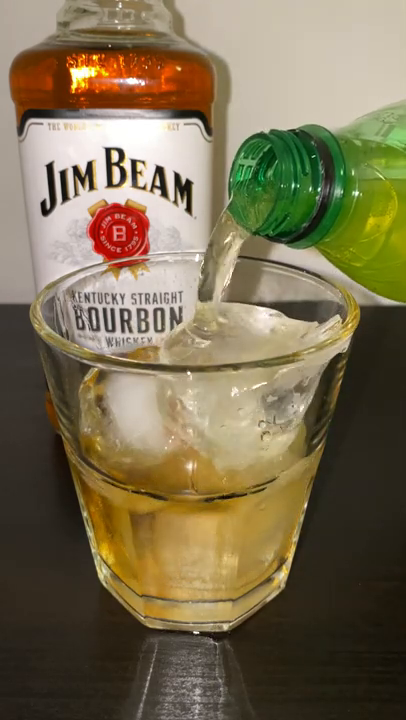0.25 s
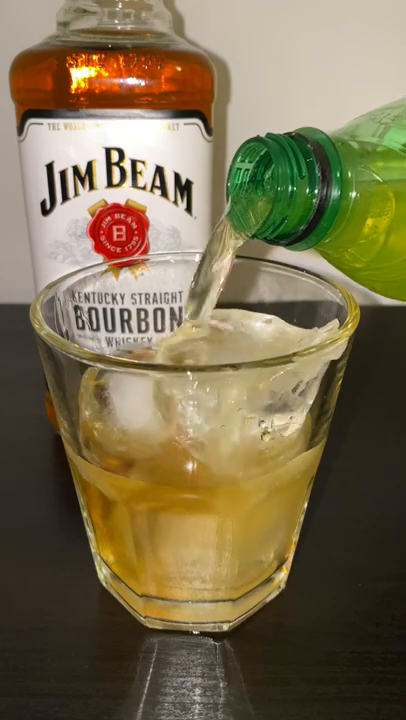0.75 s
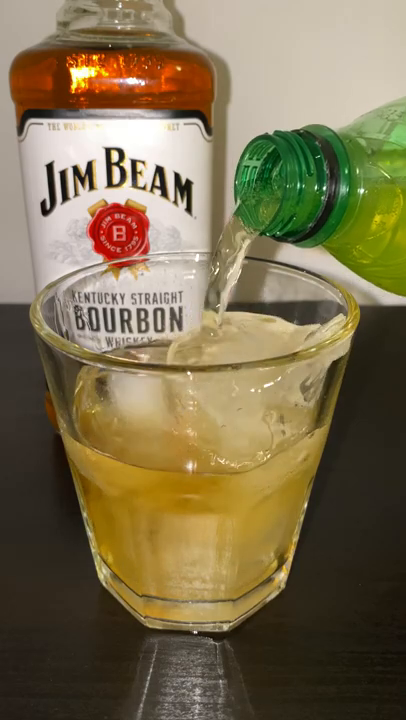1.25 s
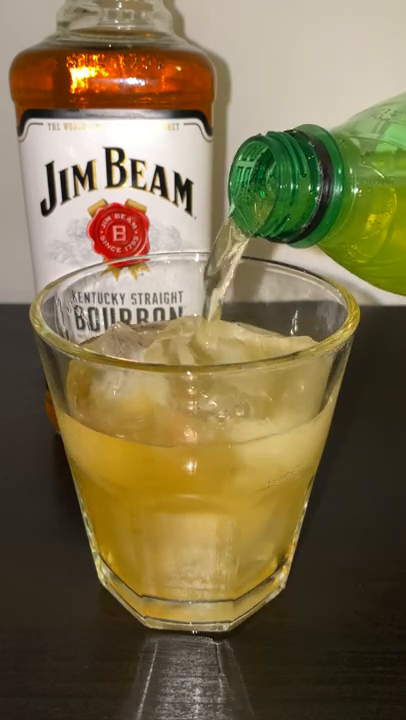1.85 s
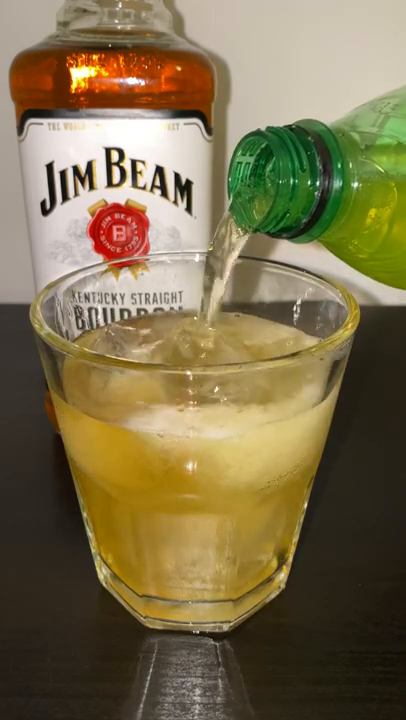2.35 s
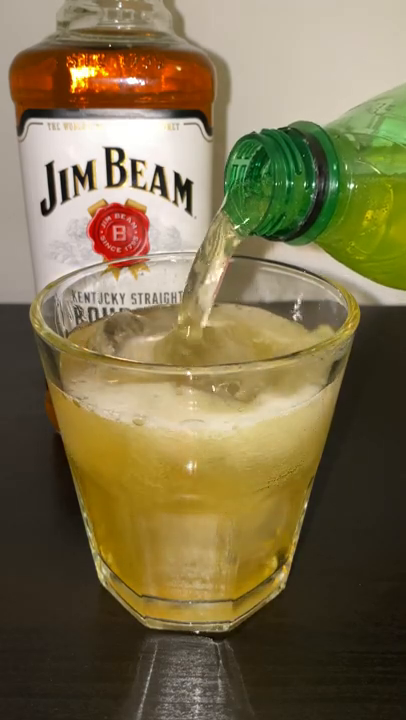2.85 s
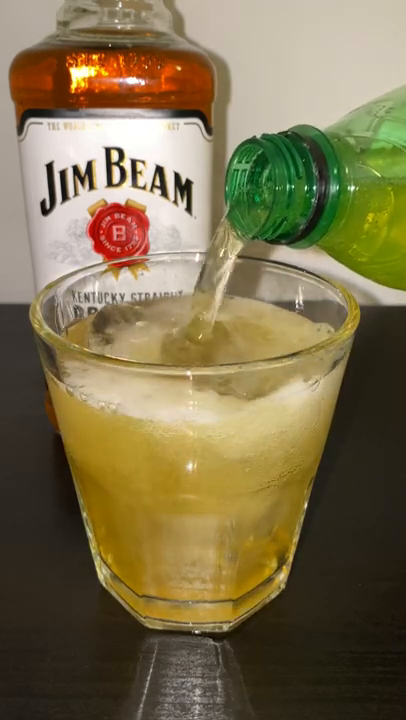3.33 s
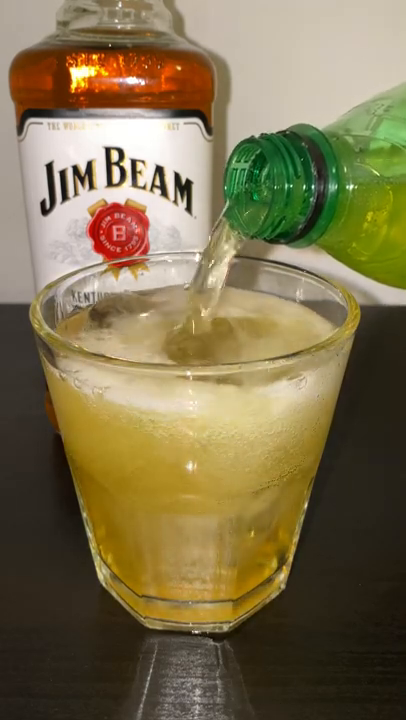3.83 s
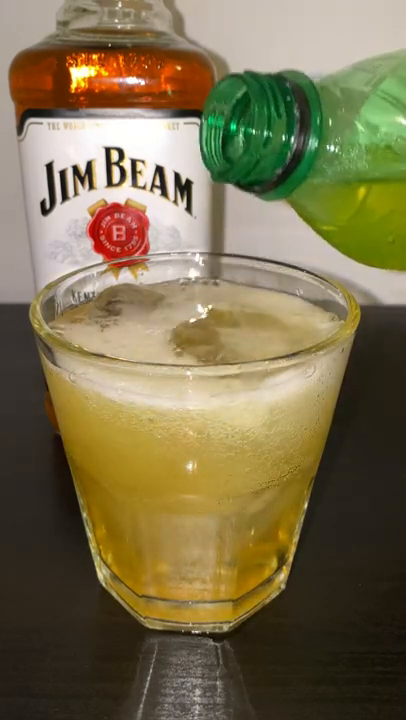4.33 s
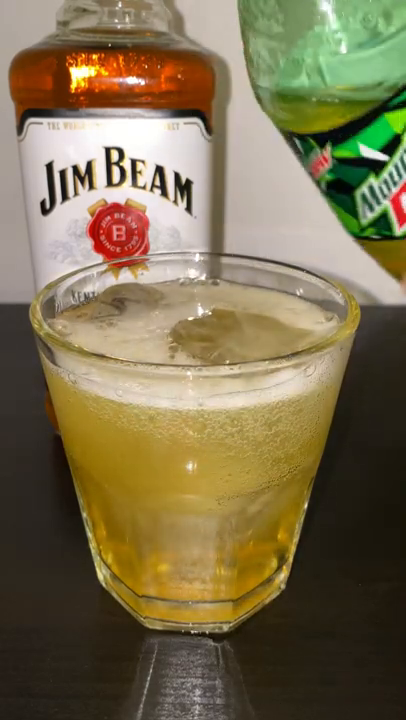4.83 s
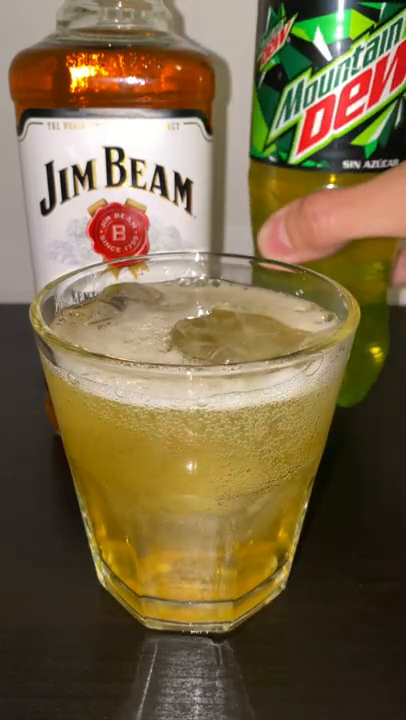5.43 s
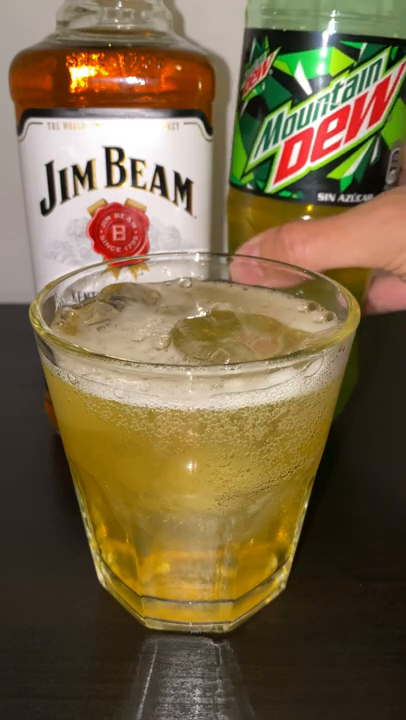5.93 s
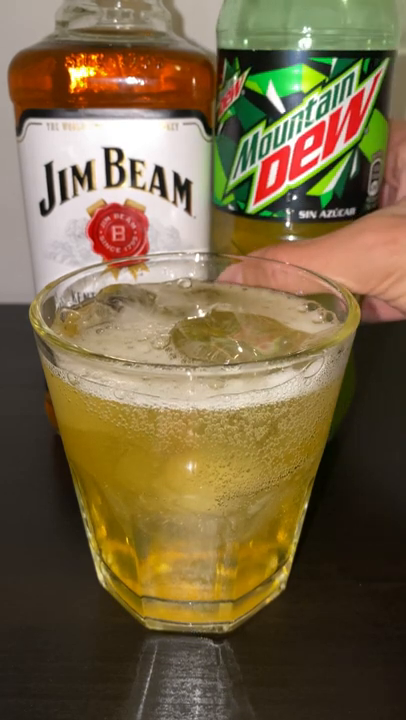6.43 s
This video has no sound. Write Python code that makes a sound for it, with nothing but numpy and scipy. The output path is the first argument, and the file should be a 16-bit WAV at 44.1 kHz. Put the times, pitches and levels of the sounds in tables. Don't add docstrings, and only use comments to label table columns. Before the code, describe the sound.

Close phone pickup, slight stereo, with low room rumble and faint hiss. Brittle ice ticks and trickling splashes lead into a cluster of glassy clinks and table knocks. The clatter stops and bubbly foam hiss rises, peaking around four seconds, over muted ice bumps. A plastic wall pops once; the fizz thins, then the bottle booms onto the table, slides and thumps again.

```python
import sys
import numpy as np
from scipy import signal
from scipy.fft import rfft, irfft
from scipy.io import wavfile
from scipy.ndimage import uniform_filter1d

SR = 44100
rng = np.random.default_rng(int(sys.argv[2]) if len(sys.argv) > 2 else 0)


def wav_out(sig):
    wavfile.write(sys.argv[1], SR, np.round(np.clip(np.atleast_2d(sig).T, -1, 1) * 32767).astype(np.int16))


def level_to_linear(level):
    exponent = np.asarray(level, float) / 20
    return 10 ** exponent


N = 294588

# f/Hz, level/dB per Hz
RUMBLE_SPECTRUM = [(12, -23), (20, -20.5), (53, 0), (75, -2), (89, 0.5), (108, -16), (129, -8.5),
                   (185, -13.5), (213, -15.5), (369, -31), (508, -25.5), (546, -24), (664, -33.5),
                   (700, -44.5), (1400, -48), (1820, -62), (3080, -120)]
# f/Hz, level/dB per Hz
MIC_HISS_SPECTRUM = [(650, -16), (1100, -42.5), (1610, 8), (2540, 3.5), (3050, 8.5), (3390, -22.5),
                     (7300, 6), (9020, -1.5), (11700, -16), (19800, -120)]
RUMBLE_DB, MIC_HISS_DB = -57.5, -88

# t/s, level/dB
FOAM_LEVEL = [(0, -88), (1.8, -87), (2.25, -82), (2.55, -77), (2.9, -72), (3.3, -69.5), (3.8, -67.5),
              (4.2, -66.5), (5.4, -67.5), (5.7, -70.5), (6.68, -75.5)]
# f/Hz, level/dB per Hz
FIZZ_SPECTRUM = [(590, -51.5), (1000, -38), (1290, -24), (1560, -12.5), (2230, -5), (2400, 0.5),
                 (2860, -0.5), (3400, -3), (3690, 1.5), (4200, -4.5), (4520, -3), (6970, -9.5), (9020, -19),
                 (11700, -45.5), (19800, -120)]
# f/Hz, width/Hz, level/dB
CAVITY_PEAKS = [(2650, 130, -4.5), (3060, 21, 8.5), (3704, 170, 3), (4474, 290, 4), (5060, 23, 9.5),
                (5630, 510, 3.5), (7100, 2300, 7.5)]

# t/s, peak level/dB, ring f/Hz, crackle over
# ring/dB
TICKS = [(0.1303, -71, 8860, 9), (0.178, -60, 6720, -18), (0.2034, -63, 6830, -17),
         (0.2359, -53, 5460, 7.5), (0.299, -60.5, 6940, 11.5), (0.3315, -61.5, 7100, 9.5),
         (0.3566, -62.5, 7100, 15.5), (0.478, -50, 6800, -1), (0.5544, -60, 6600, -13),
         (0.7467, -69, 9150, 3), (0.897, -60, 7500, -2), (0.9934, -59, 5100, 10),
         (1.112, -62.5, 6200, -3.5), (1.1413, -64, 5860, 5), (1.279, -71.5, 7800, 19),
         (1.2965, -57.5, 6680, -10), (1.4061, -65, 7150, 7), (4.4094, -59, 5000, -11),
         (2.1285, -71, 6360, 5), (2.2064, -76, 7400, 0), (2.5885, -70, 6550, 13), (3.7109, -84, 11130, 20),
         (4.41, -74, 10800, 2), (0.97, -55, 4800, -3),
         (0.218, -53.5, 3060, 9), (0.335, -65.5, 2380, 19), (0.537, -59, 1900, -5), (0.5768, -52, 1870, -2),
         (0.655, -41, 1990, -7), (0.702, -58.5, 3140, 6), (0.7472, -61, 2430, 5), (0.821, -51, 3790, 5),
         (0.85, -52, 3960, 3), (0.93, -59, 1710, -8), (1.039, -55.5, 2650, -10), (1.0587, -63.5, 3730, -10),
         (1.1013, -50.5, 1645, -11), (1.214, -50, 1620, -1.5), (1.2527, -46.5, 2710, -4),
         (1.1, -58, 2630, -12), (1.338, -49, 2860, 0), (1.3633, -46, 2730, 7), (1.3823, -58, 2220, -12.5),
         (1.4064, -47, 2620, 18), (1.42, -42.5, 2590, 18), (1.4724, -54, 1530, -14),
         (1.486, -38.5, 1940, 1), (1.487, -41.5, 2740, -8), (1.5194, -44, 2480, 7), (1.438, -48, 1900, -5),
         (1.4752, -46, 2500, -12), (1.518, -43, 1450, -3), (1.5647, -42, 2380, -16), (1.59, -55, 1693, 3.5),
         (0.5044, -54, 3850, 5), (0.6838, -57, 3120, 6), (0.759, -65, 1990, -10), (0.8848, -58, 3720, 12),
         (0.851, -65, 2400, -3), (1.06, -64, 2670, -12),
         (0.535, -58, 730, -10), (0.579, -48, 900, -9), (0.611, -54, 900, -10), (0.953, -48, 884, -10),
              (1.363, -40, 800, -6), (1.384, -43, 890, -11.5), (1.411, -55, 800, -14.5),
              (1.421, -38.5, 1010, -9), (1.438, -35, 904, -9), (1.474, -35, 884, -9),
              (1.487, -33, 986, -13.5), (1.519, -36, 1160, -11), (1.565, -47, 946, -14),
              (1.591, -34.5, 890, -4), (1.62, -45, 680, -3), (2.694, -61.5, 1400, 19),
              (2.694, -51.5, 757, -15), (2.693, -54.5, 1080, -10), (1.808, -52.5, 545, -9),
              (6.071, -60.5, 1520, -2), (6.078, -41.5, 338, -11),
         (.511, -57, 2000, 5), (0.524, -65, 2800, 4), (.59, -52.5, 3770, 11), (0.607, -52, 1730, 13),
         (.619, -55, 1900, 8), (.685, -69, 6860, 0), (.699, -56.5, 2020, 19), (.7475, -63, 3900, -2),
         (.821, -71, 1990, 5), (.83, -59, 4300, 6), (.832, -58, 3360, -9), (.896, -76, 8300, 5),
         (.897, -69, 4300, 2), (.907, -63, 4440, 8), (1.06, -71.5, 5670, 1), (1.074, -73, 7350, 0),
         (1.14, -63.5, 2670, -7), (1.2056, -68, 2860, 5), (1.2045, -70, 6800, 10), (1.254, -75, 7800, 9),
         (1.302, -60, 2870, 0), (1.321, -63.5, 1590, 0), (1.34, -62, 4300, 5), (1.347, -68, 4260, 2),
         (1.416, -46, 2700, 16), (1.452, -60, 2160, -3), (1.532, -53, 2630, 5.5), (1.594, -42.5, 2620, 7),
         (3.055, -74, 1770, 13), (.479, -55, 5600, -6), (0.494, -58, 7100, 1), (2.136, -74, 1800, -5),
         (0.657, -54.5, 2700, -5), (3.541, -61, 2480, -8), (1.518, -42.5, 1900, 8), (6.071, -54.5, 900, 8),
         (6.396, -64, 2830, 9)]
# f/Hz, t60/s
ROOM_T60 = [(100, 0.32), (700, 0.28), (2500, 0.2), (8000, 0.19)]

# start t/s, length/s, drops level/dB, fine spray over drops/dB
SPLASHES = [(0.16, 0.61, -83, 3.5), (0.458, 0.2, -69.5, -9.5), (0.523, 0.52, -66.5, -30),
            (.67, 0.11, -77, -27), (0.803, 0.07, -82, -15), (0.818, 0.38, -71.5, -20),
            (0.941, 0.054, -63, -5), (1.017, 0.36, -80, -8), (1.193, 0.094, -72.5, -2.5),
            (1.276, 0.56, -74, -10.5), (1.465, 0.12, -79, 2), (1.534, 0.26, -68, -18)]
# f/Hz, width/Hz, level/dB
WET_ICE_PEAKS = [(2400, 160, 11), (3200, 240, 7.5), (3900, 200, 7.5), (4340, 230, 9)]

# start t/s, length/s, weight level/dB, rattle over weight/dB
SETTLES = [(.47, 0.24, -46.5, -15.5), (.56, 0.29, -54, -9), (.7, 0.4, -69, -6), (.92, 0.093, -43, -50),
           (1.19, 0.33, -53, -35), (1.37, 0.28, -39, -7.5), (1.5, 0.32, -53, -14), (1.66, 0.24, -64.5, -4),
           (1.79, .12, -65, -15), (1.97, 0.32, -68.5, -7.5), (3.6, 0.2, -70, -9), (3.9, 0.19, -71.5, -13)]
# start t/s, length/s, weight level/dB, rattle over weight/dB
SLIDES = [
    (6, 0.083, -60, -5),
    (6.05, 0.17, -54, 0.5),
    (6.31, 0.19, -61.5, -7.5),
    (6.43, 0.36, -62, -7),
]
SETTLE_SCRAPE_DB, SLIDE_SCRAPE_DB = -23.5, -18.5

# t/s, high ring level/dB, low ring over it/dB
CLINKS = [(0.4806, -66, -1), (0.5082, -52, -4), (0.577, -53, 1), (0.596, -45.5, -1), (0.61, -53.5, 0.5),
          (0.6188, -51, -2), (0.9477, -60, 3), (0.954, -51.5, -2), (1.205, -83, 22), (1.214, -53, -2),
          (1.4204, -56, -10), (1.486, -42.5, -5.5), (1.52, -56, -10), (1.565, -53, -19), (1.5898, -61, 5)]
# f/Hz, level/dB, t60/s
GLASS_MODES = [
    [(7050, 3, 0.015), (7120, -5, 0.022), (7280, 1.5, 0.026)],
    [(4186, -8.5, 0.023), (4240, -8, 0.053), (4350, -19, 0.09), (4490, -13.5, 0.052)],
    [(11020, -6, 0.05), (10750, 2, 0.074)],
]
GLASS_TOP_DB = -34.5
# t/s, middle level/dB, low over it/dB, high over it/dB
KNOCKS = [(0.4935, -51, 21, 2.5), (0.502, -55.5, 23.5, 5), (0.535, -45.5, 1, -7.5), (0.579, -47, -16, 3.5),
          (0.597, -51.5, 6.5, 6), (0.66, -50, 10.5, -12), (0.932, -50.5, 17, -2.5),
          (0.953, -44.5, 13, -3.5), (1.2045, -49, 8, -3.5), (1.299, -57.5, 16, -4), (1.362, -37.5, 2.5, -5),
          (1.381, -71, -3.5, 19.5), (1.409, -47.5, -2, 6), (1.438, -40, -14, -3), (1.475, -43, -5, -9.5),
          (1.487, -28.5, -31, -4.5), (1.517, -29, -7.5, -4.5), (1.5645, -41.5, -23, -0.5),
          (1.5895, -35.5, -21.5, 5), (1.631, -46.5, -4.5, -20), (1.808, -64.5, 14.5, -29)]
# f/Hz, level/dB, t60/s
TABLE_MODES = [
    [(523.4, 2.5, 0.14), (571, -0.5, 0.093), (634, 5, 0.029), (816, 2, 0.06), (900, 1.5, 0.072),
     (957, -10.5, 0.18), (1158, -26, 0.06)],
    [(146.7, -1.5, 0.061), (216, 1.5, 0.042), (312.8, -5.5, 0.11), (436, -10.5, 0.022)],
    [(1270, -5.5, 0.038), (1520, 14, 0.008), (1956, 13.5, 0.0079), (2400, 5.5, 0.012), (2860, 8, 0.0084)],
]
# start t/s, length/s, level/dB, f/Hz
BOOMS = [(0.498, 0.077, -30.5, 88), (0.585, 0.064, -41, 99), (0.672, 0.11, -47.5, 99.7),
         (0.933, 0.1, -40, 86.5), (1.2, 0.088, -53, 85), (1.374, 0.14, -38.5, 89), (1.445, 0.13, -36, 86.9),
         (1.513, 0.057, -34.5, 103), (1.567, 0.13, -40, 93.7), (6.012, 0.067, -27.5, 92.6),
         (6.068, 0.11, -22, 79.5), (6.163, 0.15, -42, 83.3), (6.339, 0.1, -40, 88),
         (6.401, 0.066, -25.5, 92), (6.449, 0.038, -39, 90.5), (6.494, 0.047, -49, 93)]

# t/s, peak level/dB, ring f/Hz
BURSTS = [(2.7995, -55.5, 3400), (3.277, -46.5, 3620), (3.344, -54, 2780), (3.355, -51, 3020),
          (3.553, -58, 2790), (0.8205, -56, 3250), (0.868, -60, 3870), (3.5397, -51.5, 2880),
          (3.652, -57, 2980)]
# t/s, level/dB, high over it/dB, rocking/s
NUDGES = [(2.007, -64.5, -12, 0.38), (2.14, -67, -11, 0.12), (2.692, -48.5, -12, 0.065),
          (2.804, -76, -16, 0.056), (2.871, -55, -21, 0.13), (2.895, -56, -18, 0.082),
          (2.934, -59, -19, 0.12), (2.954, -62, -20, 0.09), (2.993, -69, -22, .04),
          (3.038, -50.5, -17, 0.071), (3.054, -63, -8, .05), (3.139, -70, -24, .04),
          (3.403, -73, -23, 0.046), (3.099, -73, -20, .06), (3.179, -52.5, -14, 0.059),
          (3.217, -62, -20, .04), (3.231, -60, -20, 0.08), (3.247, -61.5, -16, 0.09),
          (3.322, -62.5, -20, 0.096), (3.366, -62, -18, 0.07), (3.681, -62, -25, 0.054),
          (3.701, -65, -18, 0.074), (3.942, -63, -26, 0.066), (4.318, -63.5, -20, 0.032)]
# f/Hz, level/dB, t60/s
FULL_GLASS_MODES = [(508, 3.5, 0.067), (565, -0.5, 0.067), (676, 2, 0.057), (824, -4.5, 0.066),
                    (900, 3, 0.046), (934, -0.5, 0.04), (1080, -5, 0.016)]
NUDGE_LOW_DB, ROCK_DB, ROCK_RATTLE_DB = -23, -15, -14

# f/Hz, level/dB, t60/s
POP_MODES = [(383, -5, 0.17), (500, -2, 0.048), (730, 2.5, 0.041), (738, -11, 0.021), (1484, -6, 0.049),
             (1600, -14, .015), (2570, -6.5, 0.043)]
POP_S, POP_DB = 4.348, -42.5
# t/s, middle level/dB, low over it/dB, high over it/dB
SET_DOWN = [(6.013, -60, 17.5, -29), (6.035, -51, 7, -27), (6.07, -39.5, 9, -9.5), (6.089, -41.5, 3, -28),
            (6.127, -49, 1.5, -27), (6.16, -75, 7.5, -28), (6.375, -54, 1, -11), (6.585, -56.5, 3, -12),
            (6.333, -61, 2.5, -21), (6.397, -45, 5.5, -7), (6.41, -43, -17.5, -35)]
# f/Hz, level/dB, t60/s
BASE_MODES = [
    [(424.5, 2.5, 0.11), (535, -1.5, 0.077), (615, -9, 0.062), (806, -17.5, 0.037), (900, -17.5, 0.045)],
    [(143.2, -1.5, 0.21), (214, -1.5, 0.058), (273, -9, 0.072), (325, -5.5, 0.1)],
    [(1247, 1.5, 0.021), (1310, -22, 0.16), (1494, -3, 0.031), (1900, -2.5, 0.014), (2880, 0.5, 0.012)],
]

# f/Hz, level/dB
NEAR_WIDTH = [(60, -17.5), (106, -7), (143, -4.5), (260, -13), (360, -6.5), (480, -6.5), (650, 7.5),
              (900, 2), (1600, 0.5), (3000, 2), (4000, 4.5), (5400, 1.5), (7300, -8), (10000, 6.5)]
# f/Hz, level/dB
SPREAD_WIDTH = [(60, -25), (100, -14), (180, -11.5), (310, -0.5), (540, 1.5), (940, 10.5), (1640, 0),
                (2850, 4), (4940, 0.5), (8570, -2)]
# f/Hz, phase/rad
PORT_PHASE = [(60, -1.4), (106, -1.17), (143, -2.5), (200, -2.5), (360, -1.66), (480, 2.5), (650, -2.5),
              (880, -1.6), (1600, -1.5), (2950, -2), (5400, -1.5), (7300, -5), (10000, -4.5)]


def evened(x):
    return x / np.sqrt(np.mean(x ** 2) + 1e-20)


def read(points, hz):
    f, value = np.transpose(points)
    return np.interp(np.log(hz + 1), np.log(f + 1), value)


def add(mix, s, sound):
    part = mix[..., round(s * SR):][..., :sound.shape[-1]]
    part += sound[..., :part.shape[-1]]


def coloured(x, db):
    gain = level_to_linear(db(np.fft.rfftfreq(x.shape[-1], 1 / SR)))
    return irfft(rfft(x) * gain, x.shape[-1])


def humps(peaks, hz):
    return sum(db / (1 + (2 * (hz - f) / width) ** 2) for f, width, db in peaks)


def wander(per_s):
    span = int(SR / per_s)
    once = uniform_filter1d(rng.standard_normal(N), span)
    return evened(uniform_filter1d(once, span))


def ring(modes, luck=0., rise_s=0.0012):
    hz, db, t60 = np.transpose(modes)[:, :, None]
    t, luck = np.arange(9000) / SR, np.reshape(luck, (-1, 1))
    decay = level_to_linear(db + 4.2 * luck - 60 * t / t60)
    phase = 2 * np.pi * hz * (1 + 0.0067 * luck) * t + 3 * luck
    sound = (decay * np.sin(phase)).sum(0)
    sound *= 1 - np.exp(-(t / rise_s) ** 2)
    return sound / abs(sound).max()


def swell(length_s, share, power):
    u = np.arange(0, 1, 1 / (SR * length_s))
    return np.sin(np.interp(u, [0, share, 1], [0, np.pi / 2, np.pi])) ** power


def strokes(rows, share, power):
    out = np.zeros((2, N))
    for s, length_s, db, over_db in rows:
        gains = level_to_linear(np.array([[db], [db + over_db]]))
        add(out, s, gains * swell(length_s, share, power))
    return out


def air():
    rumble = evened(coloured(rng.standard_normal((2, N)), lambda hz: read(RUMBLE_SPECTRUM, hz)))
    rumble *= level_to_linear(1.6 * wander(per_s=8))
    hiss = evened(coloured(rng.standard_normal((2, N)), lambda hz: read(MIC_HISS_SPECTRUM, hz)))
    return level_to_linear(RUMBLE_DB) * rumble + level_to_linear(MIC_HISS_DB) * hiss


def patchy(x):
    young_until_s, fade_s, young_hz = 2.74, 0.16, 3200
    hz, t, z = signal.stft(x, SR, nperseg=1024, noverlap=768)
    a, b = rng.standard_normal((2, len(hz), len(t)))
    pockets = evened(uniform_filter1d(uniform_filter1d(a, size=2, axis=0), size=14, axis=1))
    clusters = evened(uniform_filter1d(uniform_filter1d(b, size=16, axis=0), size=8, axis=1))
    young = np.clip((young_until_s - t) / fade_s, 0, 1) / (1 + (hz[:, None] / young_hz) ** 8)
    z = z * level_to_linear(1.66 * pockets + 0.67 * clusters - 8.5 * young)
    return signal.istft(z, SR, nperseg=1024, noverlap=768)[1][:, :N]


def foam():
    pops_per_s = 9000
    sizes = level_to_linear(3.75 * np.minimum(rng.exponential(1, (2, N)), 6))
    pops = rng.standard_normal((2, N)) * sizes * (rng.random((2, N)) < pops_per_s / SR)
    pops = evened(pops) + 1.6 * rng.standard_normal((2, N))
    fizz = evened(coloured(pops, lambda hz: read(FIZZ_SPECTRUM, hz) + humps(CAVITY_PEAKS, hz)))
    hiss = patchy(fizz)
    low = coloured(hiss, lambda hz: -10 * np.log10(1 + (hz / 2300) ** 12))
    t = np.arange(N) / SR
    peak_s, peak_db, rest_db, grow_db_per_s, thin_db_per_s = 4.24, -65, -79, 13, 6.5
    large_db = peak_db + np.minimum(grow_db_per_s * (t - peak_s), thin_db_per_s * (peak_s - t))
    large = np.hypot(level_to_linear(large_db), level_to_linear(rest_db)) * level_to_linear(2.0 * wander(per_s=15.0))
    fine = level_to_linear(np.interp(t, *np.transpose(FOAM_LEVEL)))
    return level_to_linear(0.19 * wander(per_s=51)) * (fine * (hiss - low) + large * low)


def ice_ticks():
    events, t = TICKS, np.arange(9000) / SR
    out, luck = np.zeros((2, N)), rng.uniform(-1.3, 1, (len(events), 2, 1))
    noise = rng.standard_normal((len(events), 2, 9000))
    for (s, db, hz, crackle_db), lean, puff in zip(events, luck, noise):
        crackle_band = signal.butter(3, [hz / 6.3, 1.23 * hz], "band", fs=SR)
        crackle = signal.lfilter(*crackle_band, puff[0])
        crackle *= level_to_linear(crackle_db - 60 * t / .009) * (1 - np.exp(-t / .0012))
        echo_band = signal.butter(2, [0.963 * hz, 1.2 * hz], "band", fs=SR)
        echo = evened(signal.lfilter(*echo_band, puff))
        echo *= level_to_linear(-21.0 - 60 * t / 0.12) * (1 - np.exp(-t / 0.0032))
        t60 = 0.018 * (hz / 2500) ** -.4
        tone = ring([(hz, 0, t60), (0.41 * hz, -19, t60)], rise_s=0.00093)
        port_gain = level_to_linear(2.2 * lean * [[0], [1]])
        add(out, s, level_to_linear(db) * ((tone + crackle) * port_gain + echo))
    return out


def room(x):
    taps = np.zeros((2, 20000))
    at = np.arange(100, 19960, 20) + rng.integers(0, 20, (2, 993))
    np.put_along_axis(taps, at, rng.choice([-1., 1.], at.shape), 1)
    hz, t, z = signal.stft(taps, SR, nperseg=256)
    decay = level_to_linear(-60 * t / read(ROOM_T60, hz)[:, None])
    tail = signal.istft(z * decay, SR, nperseg=256)[1]
    return signal.fftconvolve(x[None], tail / np.linalg.norm(tail[0]), axes=1)[:, :N]


def splash():
    out, t = np.zeros((2, N)), np.arange(500) / SR
    drops_per_s, bands_hz = 350, [(2300, 4520), (5200, 8200)]
    for gain, (low_hz, high_hz) in zip(strokes(SPLASHES, share=0.11, power=7.5), bands_hz):
        drops = np.zeros((2, N))
        for hz in np.geomspace(low_hz, high_hz, num=9):
            grain = np.sin(2 * np.pi * hz * t * (1 + 15 * t)) * t * np.exp(-t * hz / 4.0)
            sizes = level_to_linear(2.8 * np.minimum(rng.exponential(1, N), 4))
            train = rng.standard_normal((2, N)) * sizes * (rng.random(N) < drops_per_s / SR)
            heard = evened(signal.oaconvolve(train, grain[None], axes=1)[:, :N])
            drops += level_to_linear(-4 * np.log2(hz / low_hz)) * heard
        out += gain * evened(coloured(drops, lambda hz: humps(WET_ICE_PEAKS, hz)))
    return out


def grind(rows, body, scrape_db):
    out, slips_per_s = np.zeros((2, N)), 2000
    weight, rattle = strokes(rows, share=0.18, power=2.4)
    for gain, modes in zip([rattle, weight, level_to_linear(scrape_db) * weight], body):
        sizes = level_to_linear(2.0 * np.minimum(rng.exponential(1, N), 5))
        slips = rng.standard_normal(N) * sizes * (rng.random(N) < slips_per_s / SR)
        heard = np.array([ring(modes), ring(modes, rng.uniform(-0.32, 0.24, len(modes)))])
        out += gain * evened(signal.oaconvolve(slips[None], heard, axes=1)[:, :N])
    return out


def cracks():
    out, t = np.zeros((2, N)), np.arange(1500) / SR
    band = signal.butter(4, [1500, 8600], "band", fs=SR)
    for (s, db, _), puff in zip(CLINKS, rng.standard_normal((len(CLINKS), 1500))):
        snap = evened(signal.lfilter(*band, puff))
        add(out, s, level_to_linear(db - 10.5 - 60 * t / 0.013) * snap)
    return out


def blows(events, body, rise_s):
    out, luck = np.zeros((2, N)), rng.uniform(-1.17, 1, (len(events), 3, 2, 8))
    for (s, db, *over), chance in zip(events, luck):
        for modes, over_db, (one, two) in zip(body, [0, *over], chance):
            heard = [ring(modes, row[:len(modes)], rise_s) for row in (one, one + 0.41 * two)]
            add(out, s, level_to_linear(db + over_db) * np.array(heard))
    return out


def table_boom():
    out = np.zeros(N)
    for s, length_s, db, hz in BOOMS:
        shape = swell(length_s, share=.38, power=1.2)
        add(out, s, level_to_linear(db) * shape * np.sin(2 * np.pi * hz * np.arange(len(shape)) / SR))
    return out


def bursts():
    out, t = np.zeros(N), np.arange(3000) / SR
    rise_s, t60_s, glide_per_s = 0.0034, 0.033, 1.5
    for s, db, hz in BURSTS:
        shape = (1 - np.exp(-(t / rise_s) ** 2)) * level_to_linear(db - 60 * t / t60_s)
        add(out, s, shape * np.sin(2 * np.pi * hz * t * (1 + glide_per_s * t)))
    return out


def nudges():
    events = [(s, db, NUDGE_LOW_DB, high_db) for s, db, high_db, _ in NUDGES]
    return blows(events, [FULL_GLASS_MODES, *TABLE_MODES[1:]], rise_s=0.0027)


def scene():
    clinks = [(*row, GLASS_TOP_DB) for row in CLINKS]
    rocking = [(s, rock_s, db + ROCK_DB, ROCK_RATTLE_DB) for s, db, _, rock_s in NUDGES]
    hits = ice_ticks() + splash()
    hits += grind(SETTLES + rocking, TABLE_MODES, SETTLE_SCRAPE_DB)
    hits += cracks() + blows(clinks, GLASS_MODES, rise_s=0.0011)
    hits += blows(KNOCKS, TABLE_MODES, rise_s=0.0019)
    hits += bursts() + nudges()
    add(hits, POP_S, level_to_linear(POP_DB) * ring(POP_MODES))
    hits += blows(SET_DOWN, BASE_MODES, rise_s=0.0025)
    hits += grind(SLIDES, BASE_MODES, SLIDE_SCRAPE_DB)

    near, near_apart = hits + table_boom() + level_to_linear(-10.0) * room(hits[0])
    spread, other = foam() + air()
    hz, share = np.fft.rfftfreq(N, 1 / SR), .72
    spread_apart = share * spread + np.sqrt(1 - share ** 2) * other
    apart = rfft(near_apart) * level_to_linear(read(NEAR_WIDTH, hz))
    apart += rfft(spread_apart) * level_to_linear(read(SPREAD_WIDTH, hz))
    difference = irfft(apart * np.exp(1j * read(PORT_PHASE, hz)), N)
    return near + spread + difference * np.array([[1], [-1]])


def roll_off(x):
    return signal.sosfilt(signal.butter(12, 12000, fs=SR, output="sos"), x)


def record(dry):
    cut = signal.lfilter(*signal.butter(3, 36, "high", fs=SR), dry)
    return roll_off(cut)


dry = scene()
out = record(dry)
wav_out(out)
```